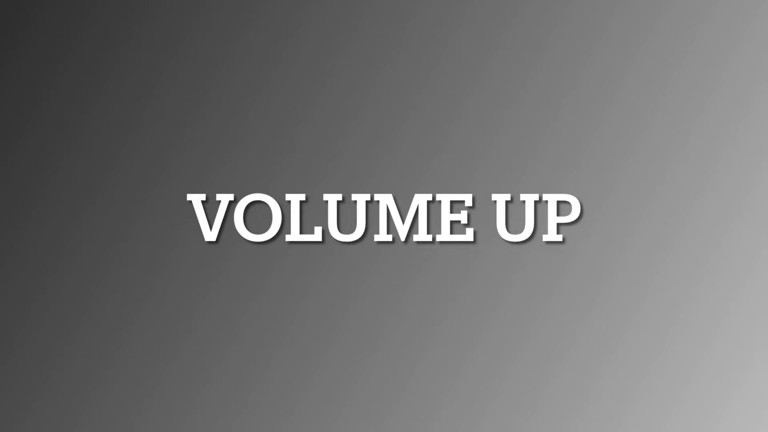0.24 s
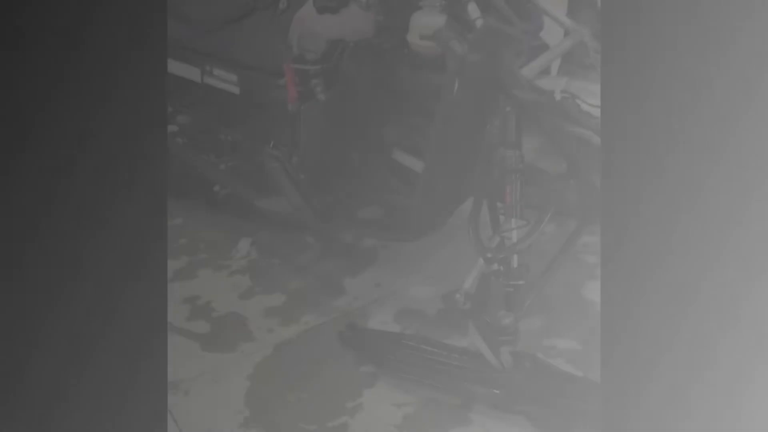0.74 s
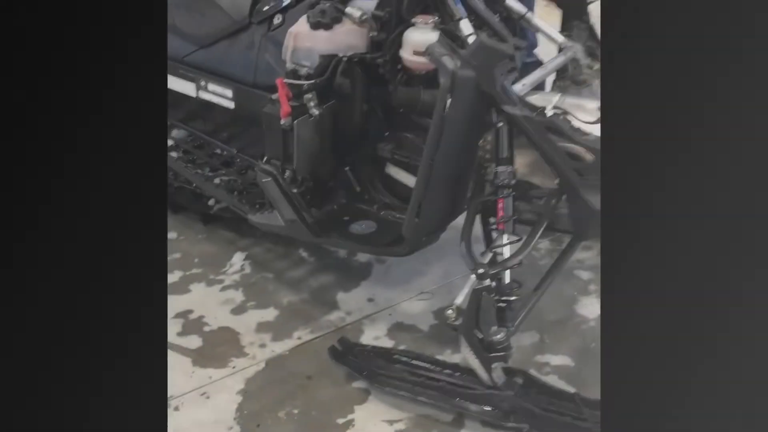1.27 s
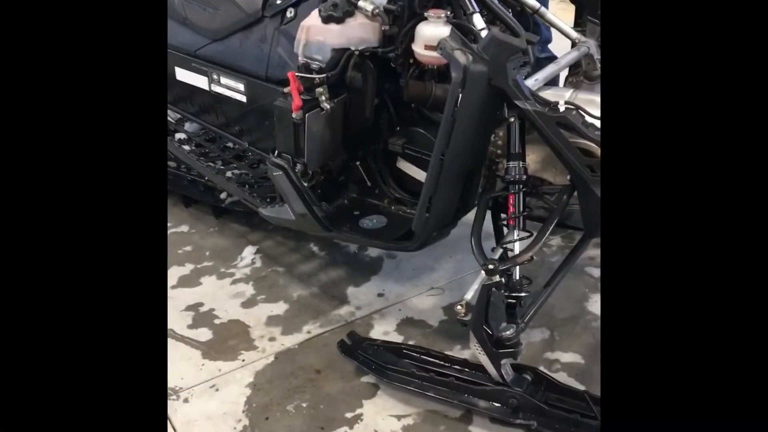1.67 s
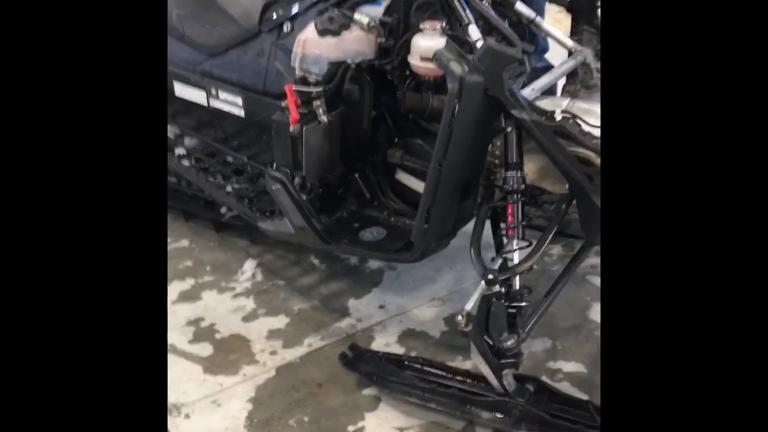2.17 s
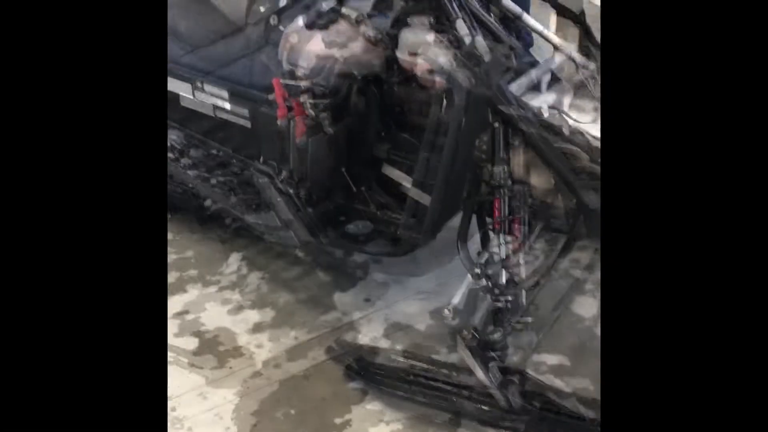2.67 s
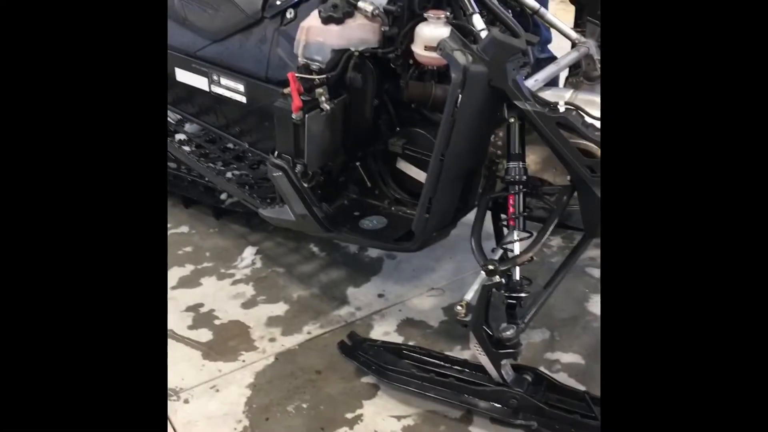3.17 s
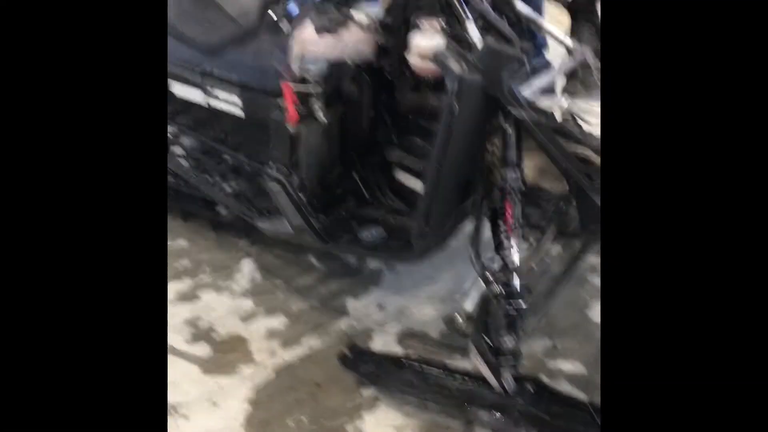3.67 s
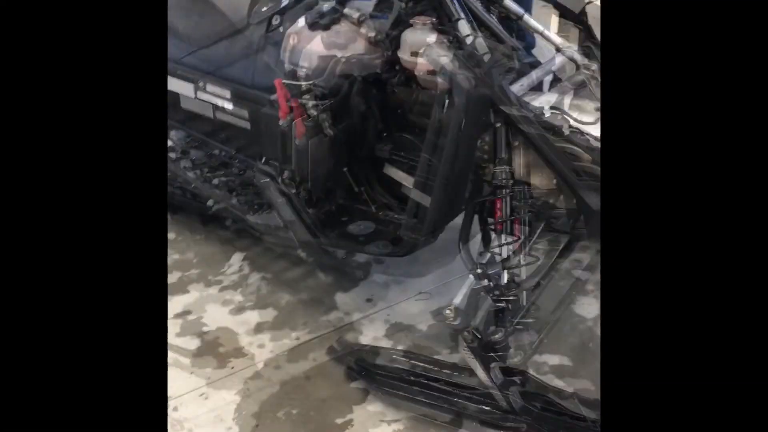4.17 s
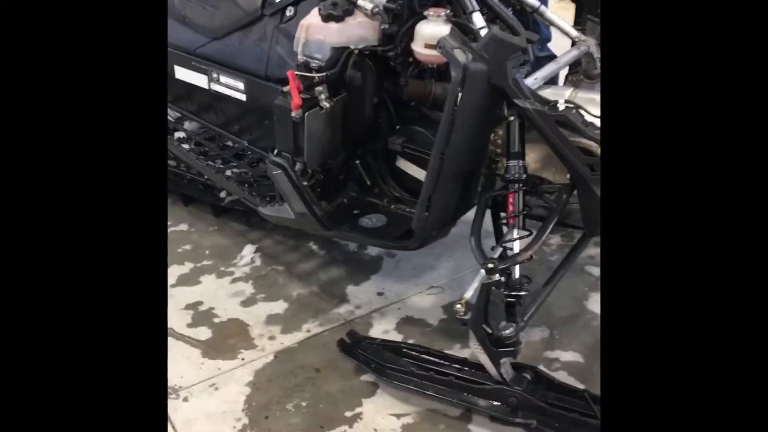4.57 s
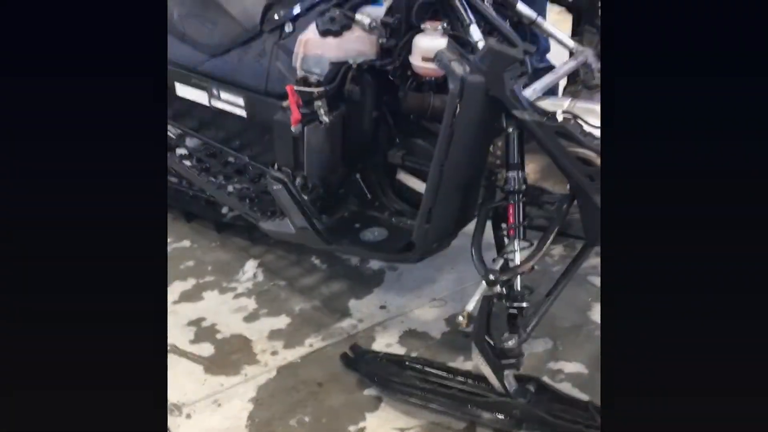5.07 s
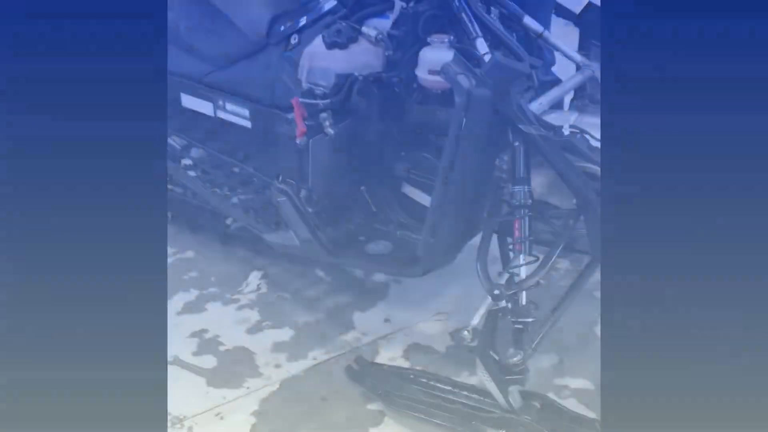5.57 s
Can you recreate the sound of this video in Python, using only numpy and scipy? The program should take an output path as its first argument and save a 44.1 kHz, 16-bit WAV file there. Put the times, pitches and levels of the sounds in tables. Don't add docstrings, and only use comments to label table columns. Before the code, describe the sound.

After brief silence, a raspy two-stroke engine idles close by in a hard workshop, its short passage repeating three times before dying away.

```python
import sys
import numpy as np
from scipy import signal
from scipy.fft import rfft, irfft, next_fast_len
from scipy.io import wavfile
from scipy.ndimage import uniform_filter1d, map_coordinates

SR = 44100
rng = np.random.default_rng(int(sys.argv[2]) if len(sys.argv) > 2 else 0)


def master_out(mix):
    frames = np.transpose(np.atleast_2d(mix))
    ceiling = np.clip(frames, -1, 1)
    pcm = np.round(ceiling * 32767).astype(np.int16)
    wavfile.write(sys.argv[1], SR, pcm)


def volts(x):
    e = np.asarray(x, float) / 20
    return 10 ** e


N = 257089
T = np.arange(N) / SR

# multiple of the firing rate, level in dB.
OPEN_ORDERS = [(1, 0.5), (2, -2), (3, 1.5), (4, -28), (5, 7), (6, -6), (7, 6), (8, -2), (9, -27.5),
               (10, -5), (11, -9), (12, -10), (13, -6), (14, -12.5), (15, -20), (16, -17), (17, -41),
               (18, -11)]
IDLE_ORDERS = [(1, -8), (2, -10), (3, -9.5), (4, -20), (5, -4), (6, -16.5), (7, 0.5), (8, -7), (9, -14.5),
               (10, -5), (11, -26), (12, -26), (13, -29.5), (14, -39), (15, -21), (16, -27), (17, -29.5),
               (18, -21.5), (19, -22), (20, -23.5), (21, -36), (22, -18.5), (23, -16), (24, -28),
               (25, -19.5), (26, -34), (27, -21), (28, -31.5), (29, -23.5), (30, -22)]
# frequency in Hz, density in dB per Hz.
OPEN_RASP = [(350, -51), (600, -12), (684, -17), (875, -0.5), (927, -22.5), (1110, -4.5), (1250, -4),
             (1470, -8.5), (1760, -21.5), (2660, -18), (2880, -25.5), (3400, -26), (4420, -28),
             (7480, -120)]
IDLE_RASP = [(350, -13), (600, -0.5), (659, 4), (694, -17), (757, -7), (997, -3), (1090, -1.5),
             (1490, -7.5), (1600, -12), (1680, -18.5), (2490, -18.5), (3400, -35), (4420, -65.5),
             (7480, -120)]
# frequency in Hz, density in dB per Hz.
OPEN_HISS = [(1760, -6.5), (3000, -6.5), (3240, -36), (3600, -13.5), (5920, -7.5), (6900, -5.5), (8700, -7),
             (10400, -11), (15100, -14), (16000, -19)]
IDLE_HISS = [(1760, -37.5), (3000, -7.5), (3500, -8), (3940, -3), (4570, -9), (4800, -6.5), (8950, -9),
             (10300, -14.5), (12500, -12.5), (16000, -26.5)]
# frequency in Hz, width in Hz, a level in dB that is not used (all are
OPEN_METAL = [(875, 35, -2), (1105, 160, 0), (1423, 60, -4), (2240, 190, -13), (2560, 150, -9),
              (3600, 91, -21), (8960, 130, -21), (9100, 100, -24)]
IDLE_METAL = [(2250, 57, 0), (2425, 92, 0), (2616, 58, -4), (2900, 21, -11), (4060, 130, -14),
              (4430, 100, -16), (6520, 320, -20), (8630, 110, -21)]
# frequency in Hz, width in Hz, level in dB.
LOOSE_PARTS = [(3500, 33, -17.5), (3910, 140, 3), (4480, 170, 3), (5330, 40, -19), (6900, 97, -3),
               (7150, 120, 1), (8500, 360, -1), (9740, 120, -8.5), (11300, 100, -4.5), (12300, 230, -10)]
# frequency in Hz, density in dB per Hz.
WALL_ECHO = [(110, -53.5), (180, -12), (247, -2.5), (297, -12.5), (312, -24), (328, -13), (344, 3.5),
             (393, -12.5), (413, -13), (477, -1), (564, -20.5), (619, -19.5), (800, -18), (1040, -44),
             (1760, -120)]
# frequency in Hz, t60 in seconds.
SHOP_DECAY = [(100, 0.2), (1000, 0.38), (8000, 0.62)]
# start in seconds, hiss peak in dB, crack in dB over the hiss, t60 in seconds.
BARKS = [
    (.614, -23, 7, 0.06),
    (0.634, -18, 6.5, .065),
    (.6764, -21.5, 0, 0.13),
    (0.6938, -20.5, 1, 0.083),
    (0.737, -21.5, 5.5, 0.11),
    (0.7588, -14, 2.5, 0.11),
    (.779, -21.5, 6, 0.043),
    (.82, -27, 0, .04),
    (0.8412, -14.5, 3, 0.084),
    (0.8599, -15.5, 7.5, 0.07),
]
# frequency in Hz, level in dB over the hiss, t60 in seconds.
SHIELD = [(2735, -12, .13), (3680, -18, .12)]
# in dB midway, then their drift in dB per second.
OPEN_DB = [-18, -25, -17, -31]
OPEN_DB_PER_S = [3.5, 29, -15, -24.5]
# level in dB, dB per dB of strength, dB per Hz of speed (on and off room resonances).
IDLE_DB = [-26, -29.5, -36.5, -59.5]
IDLE_GROWS = [1.16, 1.6, 1.1, .7]
IDLE_DB_PER_HZ = [0, 2.5, -0.5, 0]
# first drop in dB, then slow decline in dB per second.
DYING_DB = [7, 8, 3, 11]
DYING_DB_PER_S = [15, 22, 9.4, 5.8]
# time in seconds, firing rate in Hz, strength in dB.
SPEED = [
    (0.9, 49.55, 0.5),
    (1.046, 48.65, 1.5),
    (1.16, 49.88, 2),
    (1.242, 50.02, 1),
    (1.34, 48.68, -0.5),
    (1.404, 49.79, 0.5),
    (1.766, 50.32, 0),
    (1.954, 48.42, 0),
    (2.04, 49.1, -0.5),
]
# time in seconds, firing rate in Hz, strength in dB.
LAST_SPEED = [
    (5.0, 49.33, 0),
    (5.226, 48.6, -0.5),
    (5.258, 48.03, -5),
    (5.3, 47.99, -1),
]
# time in seconds, exhaust change in dB.
STUMBLES = [
    (1.175, -2.5),
    (1.305, -5.5),
    (1.465, -3),
    (1.84, -3),
    (1.965, -3),
    (2.345, -2.5),
]
# time in seconds, half width in seconds.
NULLS = [
    (.705, 0.017),
    (.778, .015),
    (.92, 0.018),
    (1.218, .025),
    (1.4, 0.012),
    (1.51, 0.051),
    (1.87, 0.013),
    (2.19, 0.045),
]
# time in seconds, half width in seconds, rise in dB.
BOOM_SWELL = (2.34, .06, 9)
FLANKS = {7: 2.02, 13: 4.5, 22: -5, 23: -5.5}
# start in seconds, peak in dB, pitch in Hz.
TICKS = [
    (1.031, -61, 3850),
    (1.135, -57, 4400),
    (1.678, -60, 4550),
    (1.755, -60, 4600),
    (1.876, -59, 4440),
    (2.522, -73, 8500),
    (2.733, -70, 8700),
    (2.787, -66, 8400),
]
# start in seconds (third playing), peak in dB,
# start and end pitch in Hz, fall time in seconds, t60 in seconds.
STOP = (5.7848, -16, 4000, 92, .0005, .1)

LOOP_S = 64681 / SR
LAST_S = 2 * LOOP_S
CUT_S, KILL_S = .885, 5.305
START_S, FADE_IN_S, END_S, FADE_OUT_S = 0.57, 0.99, 5.871, 0.86
BOOM_ORDER = 5
BLOW_ORDER = 6.352
PIPE_TOP = 14
SPREAD = 1.25
SETTLE_DB, SETTLE_S = 5.5, 0.15
COAST_S, COAST_HZ, BRAKE_HZ_PER_S = 5.322, 46.66, 94.7
THUMP_DB, THUMP_DB_PER_HZ = -18, -0.17
THUMP_HZ, THUMP_HZ_PER_HZ, THUMP_T60 = 66.6, 1.1, .058


def unit(x):
    return x / np.sqrt(np.mean(x ** 2) + 1e-20)


def curves(rows):
    s, *cols = np.transpose(rows)
    return [np.interp(T, s, c) for c in cols]


def wobble(rate):
    return map_coordinates(rng.standard_normal(int(N * rate / SR) + 4), [T * rate])


def coloured(x, points):
    m = 2 ** 15
    f, db = np.transpose(points)
    gain = volts(np.interp(np.log(np.fft.rfftfreq(m, 1 / SR) + 1), np.log(f), db))
    cep = irfft(np.log(gain + 1e-5), m)
    cep[1:m // 2] *= 2
    cep[m // 2 + 1:] = 0
    response = irfft(np.exp(rfft(cep)), m)[:m // 2]
    return signal.fftconvolve(x, response)[:N]


def shop(x, wet_db):
    hz, t, z = signal.stft(rng.standard_normal(SR // 2), SR, nperseg=256)
    f, t60 = np.transpose(SHOP_DECAY)
    decay = volts(-60 * t / np.interp(hz, f, t60)[:, None])
    tail = signal.istft(z * decay, SR, nperseg=256)[1]
    late = np.pad(x, (300, 0))
    return x + volts(wet_db) * signal.fftconvolve(late, tail / np.linalg.norm(tail))[:N]


def rung(x, modes, lift_db):
    m = next_fast_len(N + SR // 4)
    f = np.fft.rfftfreq(m, 1 / SR)
    gain = 1
    for c, w, db in modes:
        gain = gain + volts(lift_db) * 1j * f * w / (c * c - f * f + 1j * f * w)
    return irfft(rfft(x, m) * gain, m)[:N]


def patchy(x, depth_db):
    z = signal.stft(x, nperseg=512)[2]
    field = uniform_filter1d(rng.standard_normal(z.shape), size=4, axis=0)
    field = uniform_filter1d(field, size=12, axis=1)
    return signal.istft(z * volts(depth_db * unit(field)), nperseg=512)[1][:N]


def pings(modes, count, t60, scatter_db):
    chance, t = rng.random((count, 4)), T[:SR // 20]
    hz, width, db = np.array(modes)[(chance[:, 0] * len(modes)).astype(int)].T
    size = volts(1.4 * db - scatter_db * np.log(1 - .9 * chance[:, 1]))
    pitch = hz + width * (chance[:, 2] - .5)
    envelope = volts(-60 * t / t60) * (1 - np.exp(-t / .0015))
    ring = size[:, None] * np.sin(2 * np.pi * pitch[:, None] * t) * envelope
    at = (chance[:, 3] * N).astype(int)[:, None] + np.arange(len(t))
    return unit(np.bincount(at.ravel(), ring.ravel())[:N])


def nulls_db():
    return sum(20 * np.log10(1 - .95 * np.exp(-((T - s) / width) ** 2)) for s, width in NULLS)


def pipe_hum(rate, turns, exhaust_db, boom_db, rasp_db, orders, spread, sway_db):
    drift, lines = wobble(14.18), 0
    for k, db in orders:
        if k == BOOM_ORDER:
            base_db = boom_db
        elif k > PIPE_TOP:
            base_db = rasp_db + 8
        else:
            base_db = exhaust_db
        flank_db = FLANKS.get(k, 0) * (rate - 49.5)
        sway = sway_db * min(k / 6, 1) * (0.49 * wobble(9.58) + .5 * drift)
        delay = spread * (min(k, PIPE_TOP) - BLOW_ORDER) ** 2 + 0.0799 * max(k - PIPE_TOP, 0) ** 2
        phase = 2 * np.pi * k * turns - delay + 0.029 * k * wobble(9)
        lines = lines - volts(base_db + db + flank_db + sway) * np.cos(phase)
    return lines


def engine(controls, orders, rasp, hiss, metal, first_s, spread, sway_db, rough, puff_s, steady,
           noise_db, ping_db, fire):
    rate, exhaust_db, boom_db, rasp_db, hiss_db = controls
    turns = np.cumsum(rate) / SR
    turns -= np.interp(first_s, T, turns)
    at = np.flatnonzero(np.diff(np.floor(turns)))
    blows = np.zeros(N)
    blows[at] = volts(1.2 * rng.standard_normal(len(at)))
    puffs = steady + unit(signal.fftconvolve(blows, volts(-60 * T[:SR // 8] / puff_s))[:N])

    def gas():
        return unit(puffs * rng.standard_normal(N))

    lines = pipe_hum(rate, turns, exhaust_db, boom_db, rasp_db, orders, spread, sway_db)
    pipe = [(11.0, -85.5)] + [(k * 50.2, db) for k, db in orders[:PIPE_TOP]] + [(800, -84.5)]
    churn = volts(exhaust_db + noise_db) * unit(coloured(gas(), pipe))
    echo = volts(exhaust_db + 1.0) * unit(coloured(rng.standard_normal(N), WALL_ECHO))

    body = np.sqrt(1 - rough) * fire * unit(blows) + np.sqrt(rough) * gas()
    body = patchy(shop(body, wet_db=4.5), depth_db=2.0)
    body = unit(rung(coloured(body, rasp), metal, lift_db=-0.5))

    fizz = coloured(gas() * volts(0.34 * wobble(29.93)), hiss)
    fizz = patchy(unit(rung(fizz, metal, lift_db=-3.5)), depth_db=2.0)
    fizz = fizz + volts(ping_db) * pings(LOOSE_PARTS, count=700, t60=0.061, scatter_db=2.5)

    hum = fire * (lines + churn) + np.sqrt(1 - fire ** 2) * echo
    return hum + volts(rasp_db - 1.2 * fire) * body + volts(hiss_db) * fizz


def open_pipe():
    from_middle = np.clip(T, START_S, CUT_S) - (START_S + CUT_S) / 2
    levels = np.array(OPEN_DB)[:, None] + np.outer(OPEN_DB_PER_S, from_middle)
    levels[1] += nulls_db()
    firings_hz = 48.5 + 0 * T
    running = engine([firings_hz, *levels], np.add(OPEN_ORDERS, [0, 1.5]), OPEN_RASP, OPEN_HISS, OPEN_METAL,
                     first_s=.7558, spread=SPREAD, sway_db=3, rough=0.81, puff_s=0.15, steady=3.0,
                     noise_db=-12.0, ping_db=-9, fire=0.64)
    return np.clip((CUT_S - T) / 0.0038, 0, 1) * (volts(-4.0) * running + barks())


def barks():
    spit, crack, shock, shield = np.zeros((4, N))
    t = T[:SR // 8]
    for s, db, crack_db, t60 in BARKS:
        start = round(s * SR)
        burst = volts(-60 * t / t60) * (1 - np.exp(-t / 0.00033))
        spit[start:][:len(t)] += volts(db - 7) * burst
        crack[start:][:len(t)] += volts(db + crack_db - 3.0) * burst ** 1.21
        for hz, over_db, life in SHIELD:
            shield[start:][:len(t)] += volts(db + over_db - 60 * t / life) * np.sin(2 * np.pi * hz * t)
        shock[start] = volts(db + crack_db + 30)

    def noise(colour):
        return unit(rung(coloured(rng.standard_normal(N), colour), OPEN_METAL, lift_db=0.5))

    struck = rung(coloured(shop(shock, wet_db=-4), OPEN_RASP), OPEN_METAL, lift_db=1.5)
    return shield + spit * noise(OPEN_HISS) + crack * noise(OPEN_RASP) + struck


def idle():
    rate, strength_db = curves(list(SPEED) + [(s - LAST_S, *rest) for s, *rest in LAST_SPEED])
    strength_db = strength_db - SETTLE_DB * np.exp(-np.abs(T - CUT_S) / SETTLE_S)
    dead = np.clip(T - KILL_S + LAST_S, 0, 1)
    levels = np.array(IDLE_DB)[:, None] + np.outer(IDLE_GROWS, strength_db)
    levels += np.outer(IDLE_DB_PER_HZ, rate - 49.5)
    levels -= np.outer(DYING_DB, 1 - np.exp(-dead / 0.11)) + np.outer(DYING_DB_PER_S, dead)
    swell_s, swell_width, swell_db = BOOM_SWELL
    levels[1] += nulls_db() + swell_db * np.exp(-((T - swell_s) / swell_width) ** 2)
    levels[0] += sum(db * np.exp(-((T - s) / 0.02) ** 2) for s, db in STUMBLES)
    fire = np.clip((KILL_S - LAST_S - T) / .06 + 1, 0, 1)
    running = engine([rate, *levels], np.add(IDLE_ORDERS, [0, 1.5]), IDLE_RASP, IDLE_HISS, IDLE_METAL,
                     first_s=1.65, spread=SPREAD, sway_db=1.5, rough=0.74, puff_s=0.087, steady=.8,
                     noise_db=-10.5, ping_db=-12, fire=fire)
    return np.clip((T - CUT_S + 0.026) / .004, 0, 1) * running


def ticks():
    out, t = np.zeros(N), T[:SR // 10]
    for s, db, hz in TICKS:
        spit = .3 * np.diff(rng.standard_normal(len(t) + 1)) * volts(-60 * t / .03)
        knock = 1.6 * np.sin(2 * np.pi * hz * t) + spit
        out[round(s * SR):][:len(t)] += volts(db - 60 * t / 0.14) * knock * (1 - np.exp(-t / .001))
    return out


def rundown():
    out, t = np.zeros(N + SR), T[:SR // 8]
    strokes = np.arange(int(COAST_HZ ** 2 / (2 * BRAKE_HZ_PER_S)) + 1)
    for rate in np.sqrt(COAST_HZ ** 2 - 2 * BRAKE_HZ_PER_S * strokes):
        s = COAST_S + (COAST_HZ - rate) / BRAKE_HZ_PER_S
        db, hz = THUMP_DB + THUMP_DB_PER_HZ * rate, THUMP_HZ + THUMP_HZ_PER_HZ * rate
        ring = np.sin(2 * np.pi * hz * t) + volts(-5) * np.sin(2 * np.pi * 46 * t)
        thump = volts(db + 11 - 60 * t / THUMP_T60) * ring * (1 - np.exp(-t / .008))
        out[round((s - LAST_S) * SR):][:len(t)] -= thump
    s, db, from_hz, to_hz, fall, t60 = STOP
    turns = to_hz * t + from_hz * fall * (1 - np.exp(-t / fall)) + 300 * .002 * (1 - np.exp(-t / .002))
    envelope = volts(db - 60 * t / t60 * (.3 + 30 * t)) * (1 - np.exp(-t / .0012))
    out[round((s - LAST_S) * SR):][:len(t)] += envelope * np.sin(2 * np.pi * turns)
    return out[:N]


def scene():
    fade = np.clip((T - START_S) / FADE_IN_S, 0, 1) * np.clip((END_S - LAST_S - T) / FADE_OUT_S, 0, 1)
    closing = np.clip((N / SR - LAST_S + .02 - T) / 0.031, 0, 1)
    passage = (open_pipe() + idle() + ticks() + rundown()) * fade * closing
    return sum(np.pad(passage, (round(k * LOOP_S * SR), 0))[:N] for k in range(3))[None]


def low_pass(x):
    return signal.sosfilt(signal.butter(12, 16450, fs=SR, output="sos"), x)


def record(dry):
    m = next_fast_len(N + SR // 2)
    hz = np.fft.rfftfreq(m, 1 / SR)
    band = (hz < 15900) / (1 + (36 / (hz + 1)) ** 8)
    kept = irfft(rfft(dry, m) * band, m)[:, :N]
    kept = kept / (1 + np.abs(kept / .25) ** 4) ** .25
    return low_pass(kept)


dry = scene()
out = record(dry)
master_out(out)
```